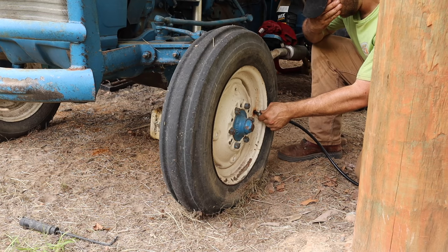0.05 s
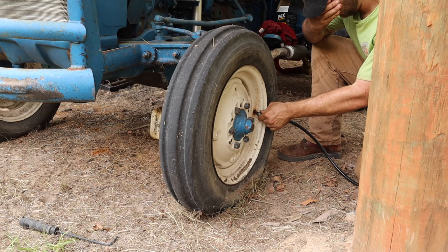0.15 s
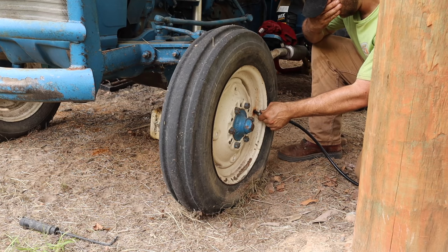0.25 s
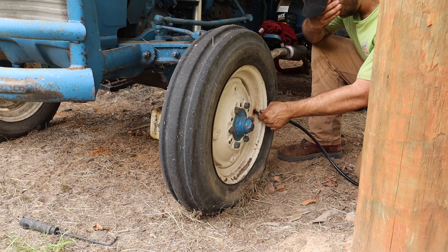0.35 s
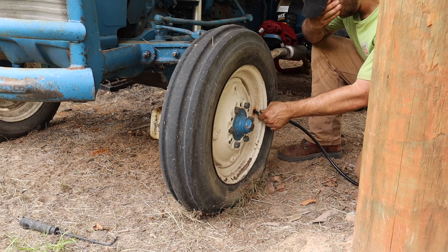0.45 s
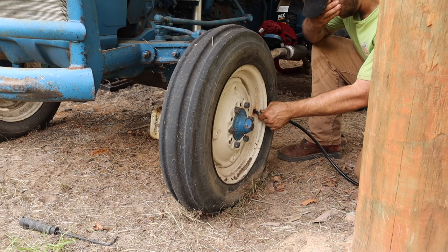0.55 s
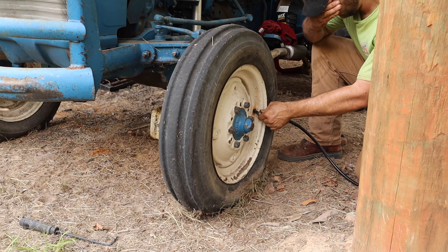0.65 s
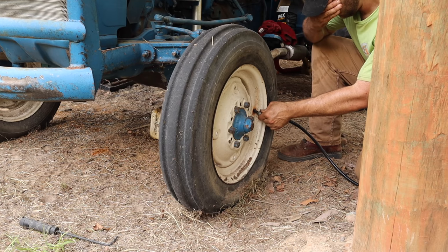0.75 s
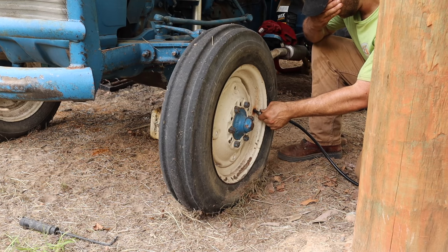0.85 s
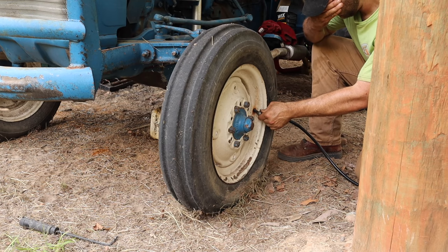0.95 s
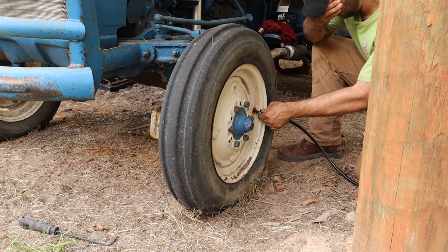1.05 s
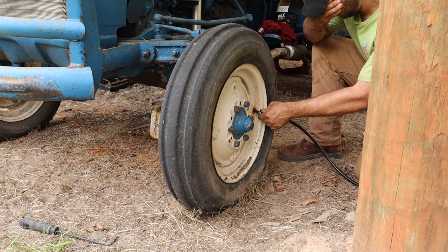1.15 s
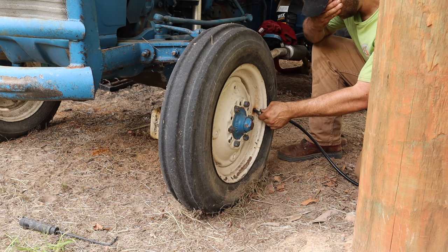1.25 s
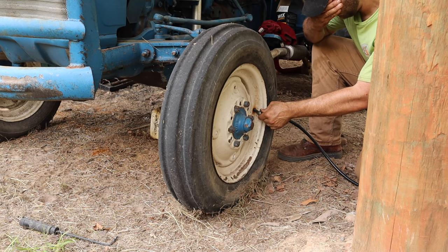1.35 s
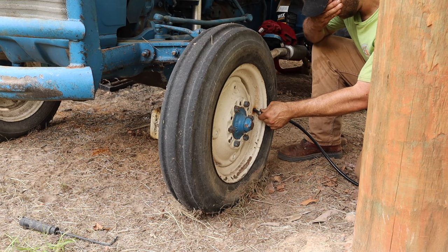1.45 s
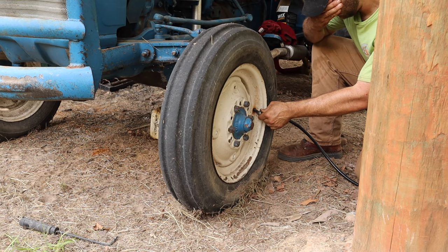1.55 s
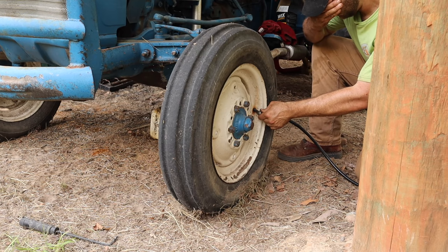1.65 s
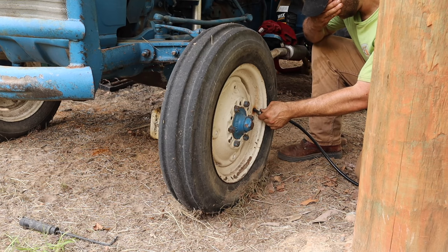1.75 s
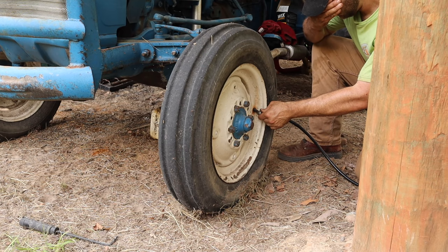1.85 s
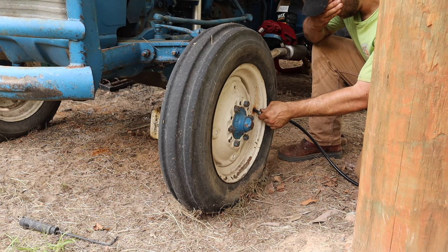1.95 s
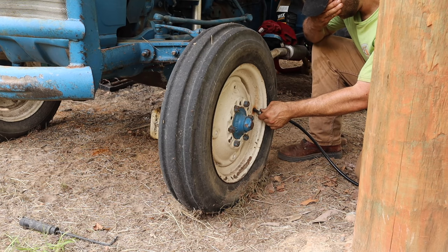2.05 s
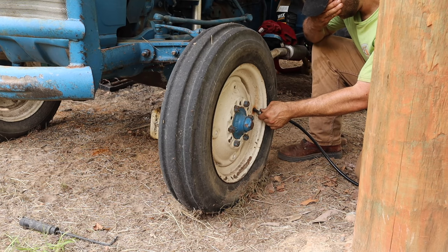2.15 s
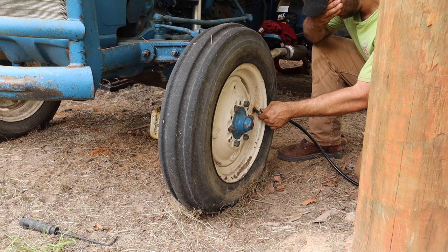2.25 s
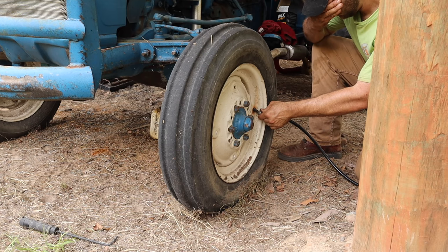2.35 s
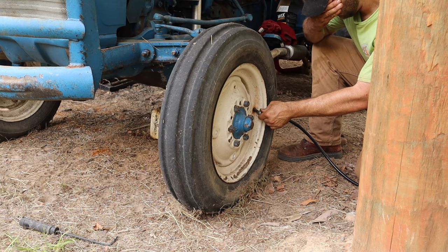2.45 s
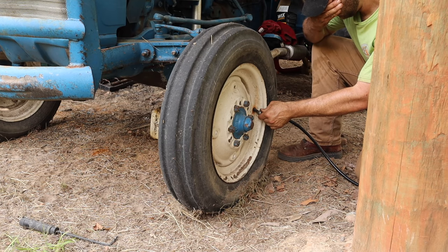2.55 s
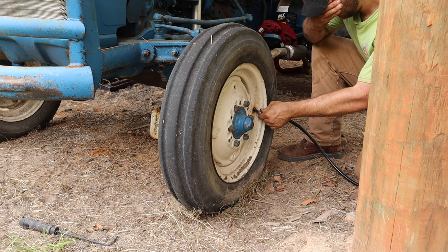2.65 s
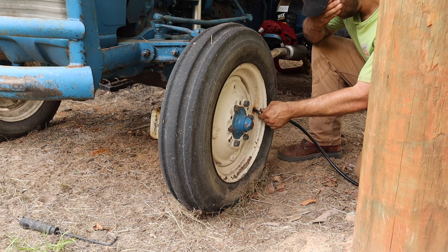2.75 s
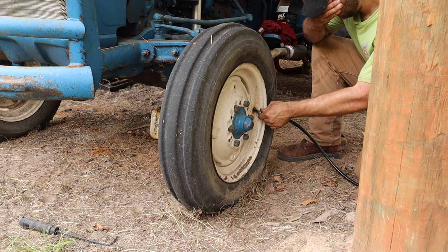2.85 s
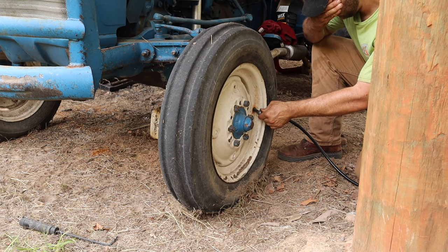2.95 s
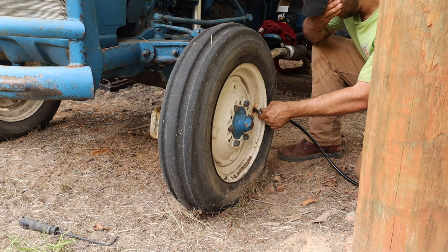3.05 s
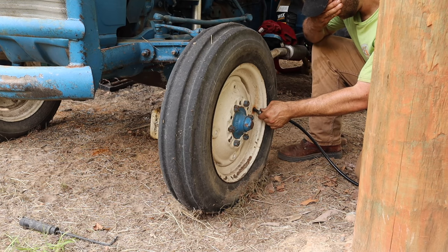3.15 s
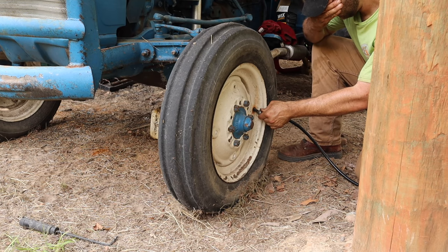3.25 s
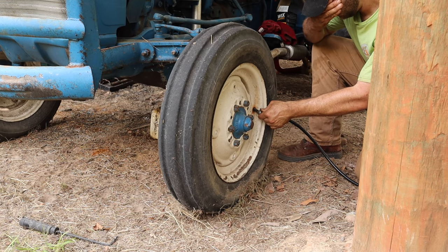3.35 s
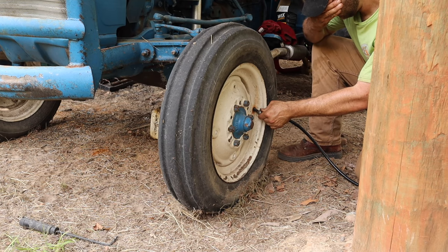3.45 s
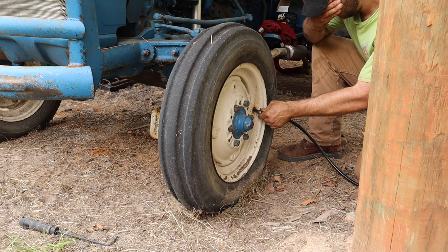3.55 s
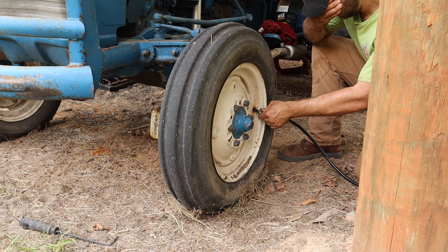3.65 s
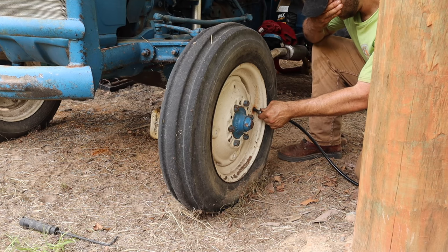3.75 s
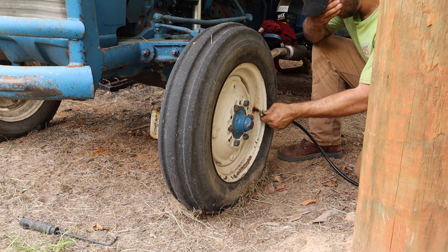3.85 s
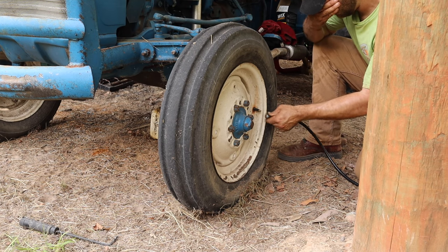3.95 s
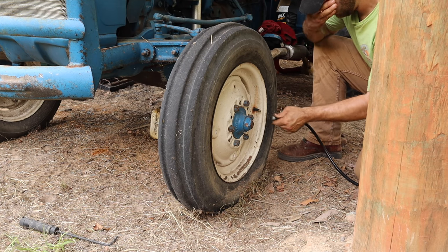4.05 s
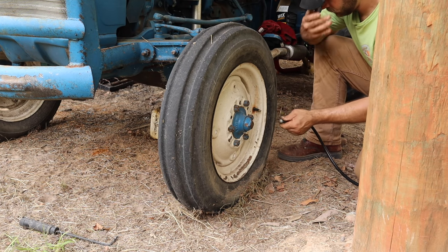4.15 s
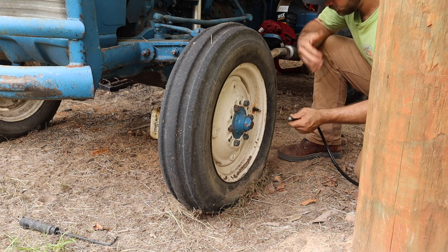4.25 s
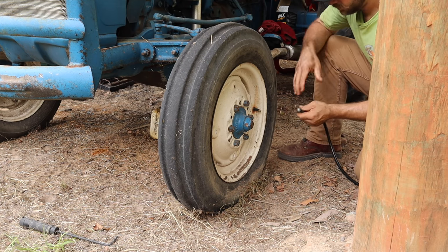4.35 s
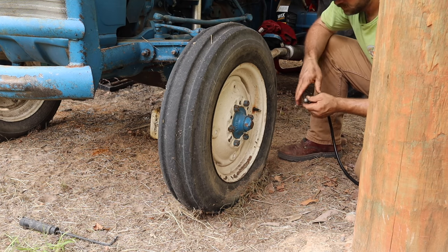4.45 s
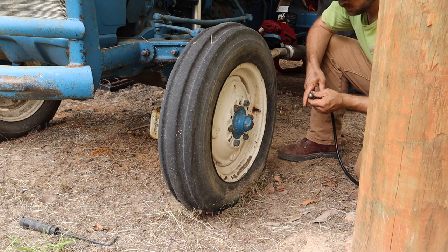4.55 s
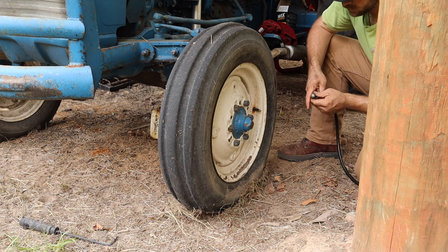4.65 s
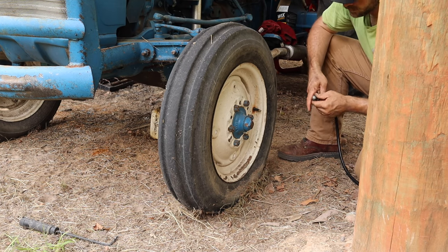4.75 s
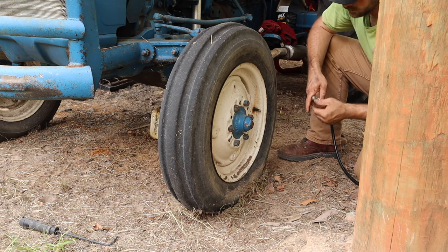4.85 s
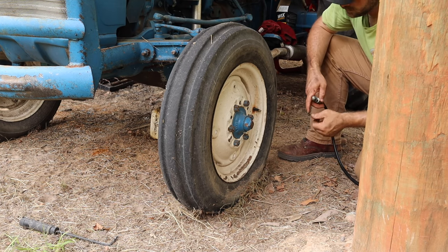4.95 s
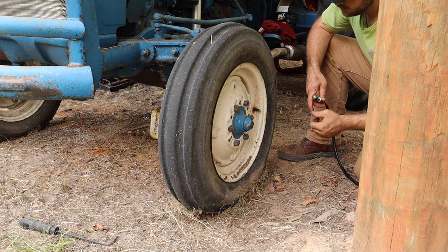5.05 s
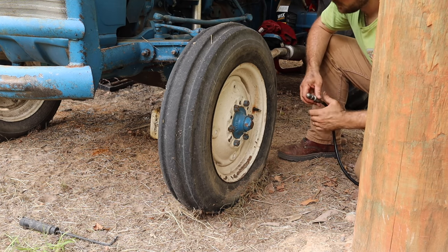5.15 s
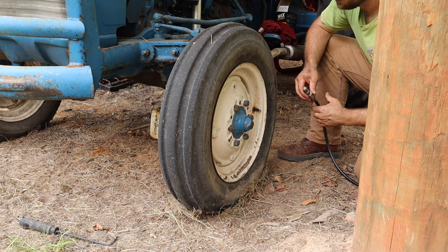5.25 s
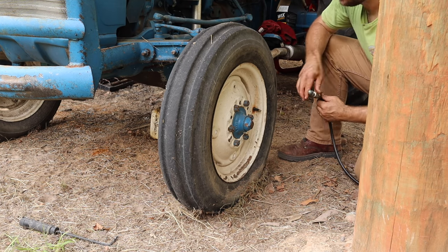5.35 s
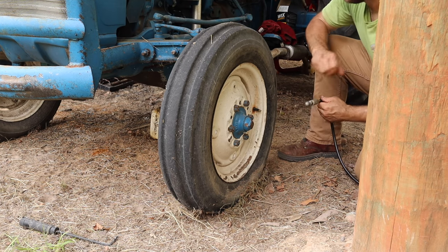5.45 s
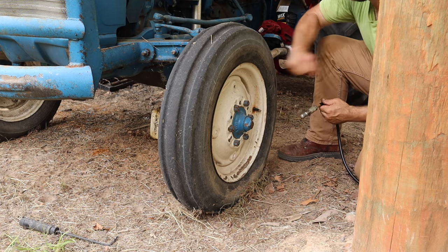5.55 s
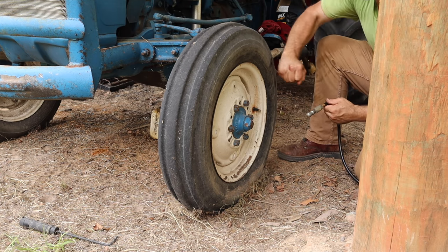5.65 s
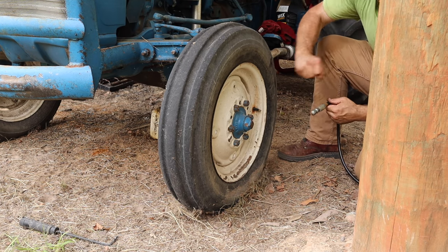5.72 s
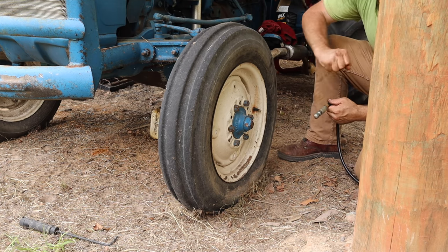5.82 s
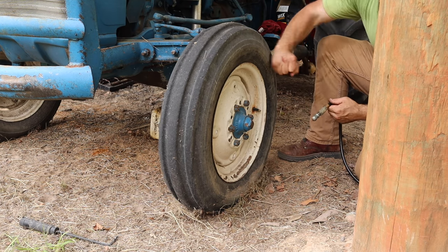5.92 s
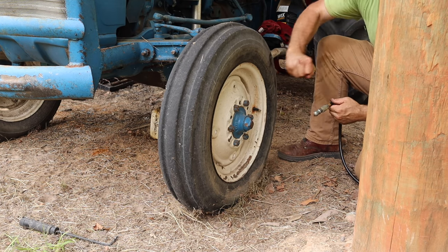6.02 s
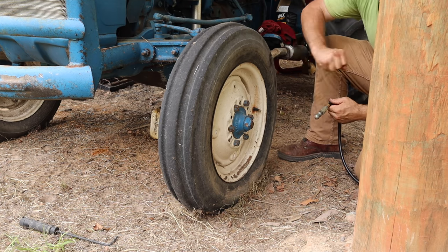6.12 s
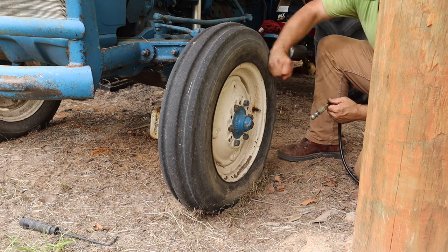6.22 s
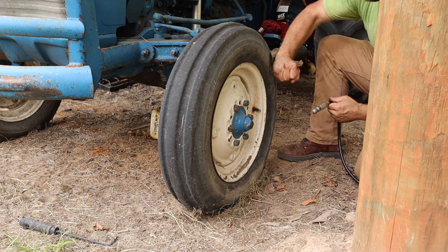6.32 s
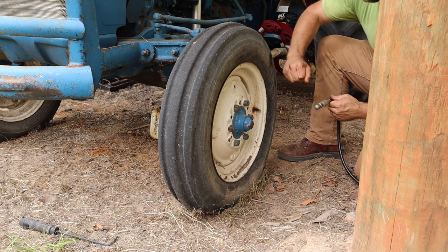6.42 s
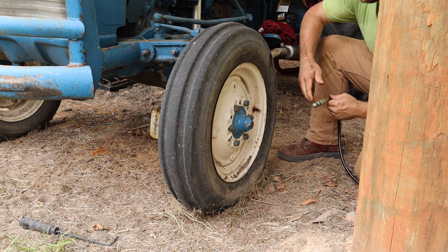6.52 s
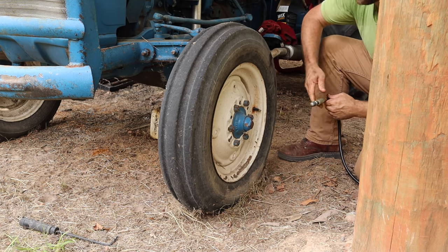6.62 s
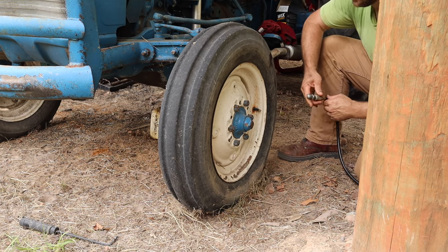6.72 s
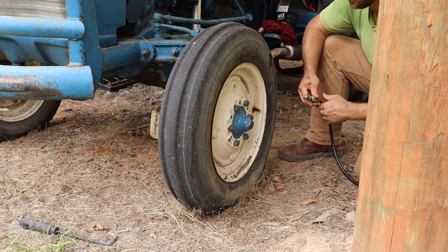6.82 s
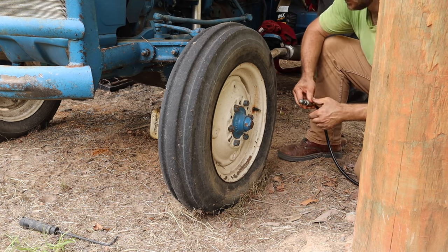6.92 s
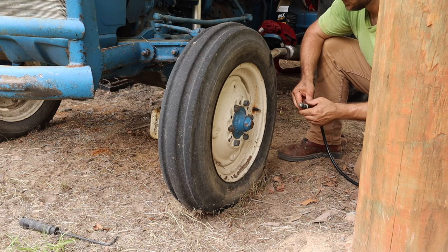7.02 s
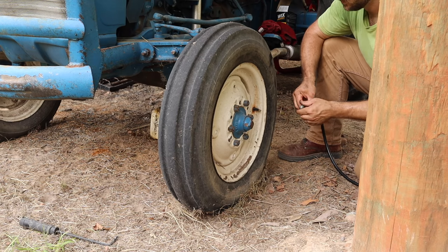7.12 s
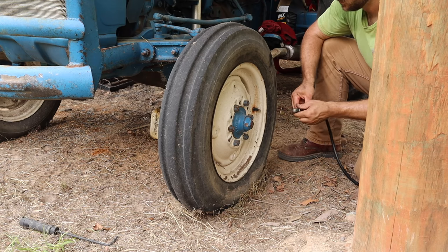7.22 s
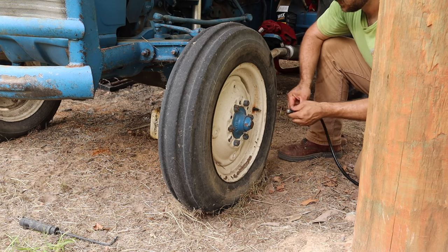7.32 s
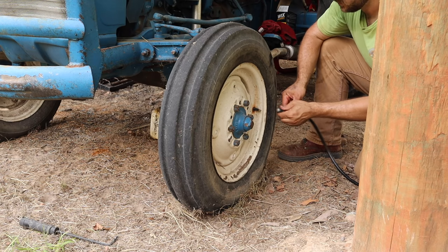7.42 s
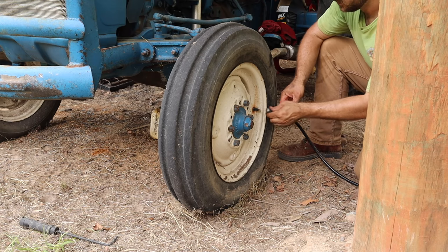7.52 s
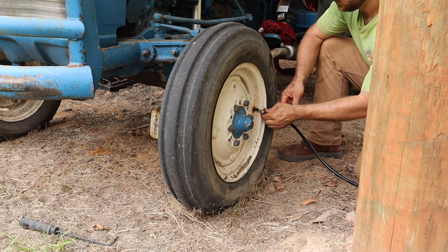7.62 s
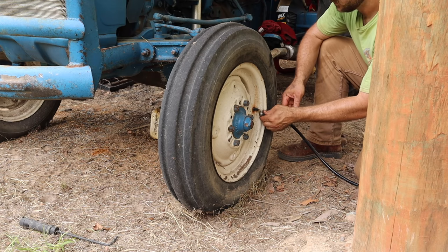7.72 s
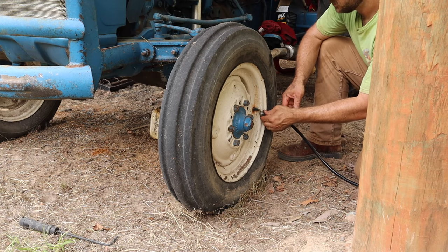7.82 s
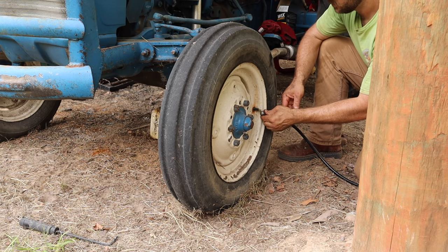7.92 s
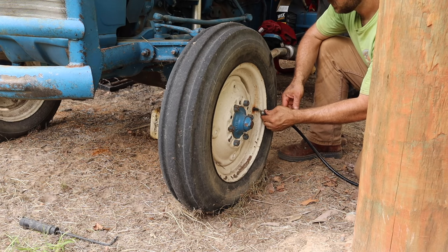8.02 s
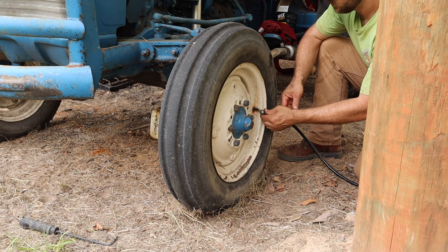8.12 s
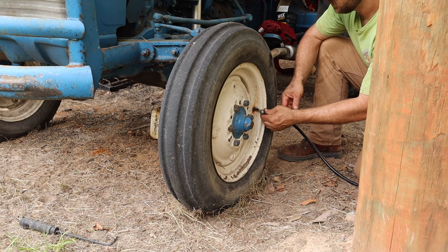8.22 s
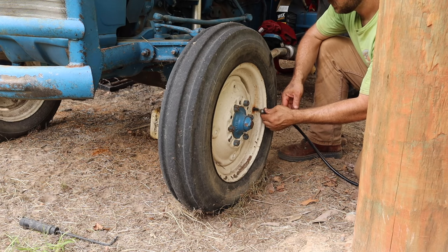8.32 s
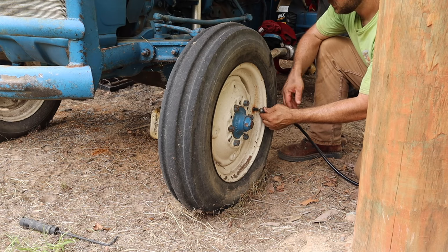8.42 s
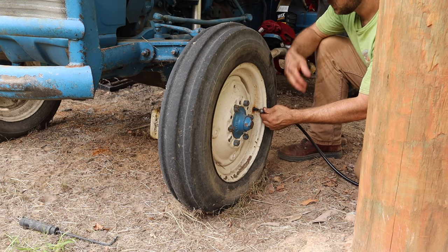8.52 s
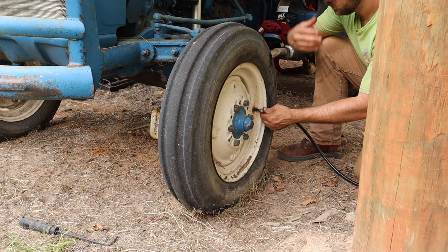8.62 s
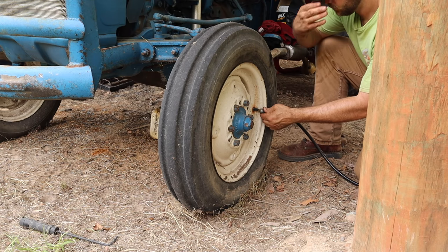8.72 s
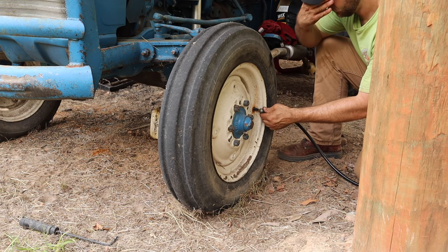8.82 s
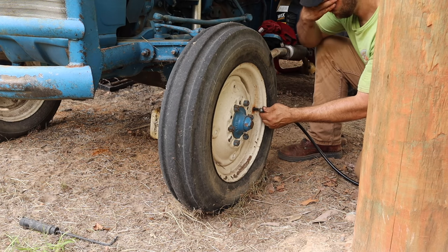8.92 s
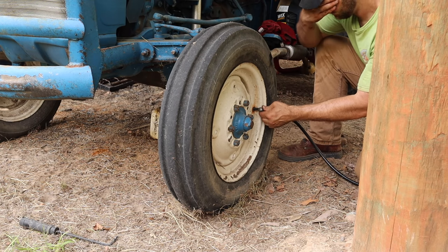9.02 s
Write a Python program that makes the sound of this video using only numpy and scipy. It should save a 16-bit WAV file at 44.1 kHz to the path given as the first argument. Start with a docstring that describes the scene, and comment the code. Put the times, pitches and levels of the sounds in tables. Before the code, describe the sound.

A faint motor hum gives way to air hissing steadily from a hose into a tractor tyre, until the chuck pops off with a sharp puff. Three loud knocks ring a hollow steel body and rattle its panels. The chuck clicks back on, leaks with a loud whistling hiss and puffs off again. It is heard in stereo a few metres from an open shed, with low rumble and a faint bird.

```python
"""Air hisses from a hose into a tractor tyre at the mouth of an open shed, heard in stereo a few metres off. A
motor hums first; then the scene changes to low rumble and the hiss of filling, until the chuck pops off with a
puff. Three knocks ring a hollow steel body and rattle its panels. The chuck clicks back on, leaks loudly
through a poor seal and pops off again. The shed echoes the near sounds; a faint bird whistles far away."""
import sys
import numpy as np
from scipy import signal
from scipy.fft import rfft, irfft
from scipy.io import wavfile
from scipy.ndimage import uniform_filter1d

SR = 44100
rng = np.random.default_rng(int(sys.argv[2]) if len(sys.argv) > 2 else 0)


def master_out(mix):
    """Clip the mix to full scale and print it as 16-bit PCM to the path in sys.argv[1]."""
    frames = np.transpose(np.atleast_2d(mix))
    ceiling = np.clip(frames, -1, 1)
    pcm = np.round(ceiling * 32767).astype(np.int16)
    wavfile.write(sys.argv[1], SR, pcm)


N = 400428
T = np.arange(N) / SR
FILL_START_S = 1.18


def undb(db):
    """Decibels to gain."""
    return 10 ** (np.asarray(db, float) / 20)


def on_log(hz, table):
    """Read an (Hz, dB) table on a log-frequency axis."""
    f, db = np.transpose(table)
    return np.interp(np.log(hz + 1), np.log(f + 1), db)


def noise(colour, width, resonances=(), size=N, locked=0.):
    """Coloured stereo noise of mid rms 1; positive `locked` leads the left ear in phase."""
    hz = np.arange(size // 2 + 1) * SR / size
    db = on_log(hz, colour) + sum(boost / (1 + (2 * (hz - f) / bw) ** 2) for f, bw, boost in resonances)
    mid, side = rfft(rng.standard_normal((2, size))) * undb(db)
    side = 1j * locked * mid + np.sqrt(1 - locked ** 2) * side
    mid, side = irfft(mid, size), irfft(side * undb(on_log(hz, width)), size)
    return np.array([mid + side, mid - side]) / np.std(mid)


def band(x, hz, width_hz):
    """Two-pole band-pass."""
    return signal.lfilter(*signal.iirpeak(hz, hz / width_hz, fs=SR), x)


def wander(rate_hz):
    """Smooth random drift with a spread near 1."""
    hold = int(SR / rate_hz)
    steps = np.repeat(rng.standard_normal(N // hold + 1), hold)
    return 1.72 * uniform_filter1d(uniform_filter1d(steps, hold), hold)[:N]


def gate(start, end, rise, fall):
    """Opens from start and has closed at end + fall, all in seconds."""
    return np.clip((T - start) / rise, 0, 1) * np.clip((end + fall - T) / fall, 0, 1)


def decay(t, t60):
    """Silent before t = 0, then falling 60 dB every t60 seconds."""
    return (t >= 0) * np.exp(-np.log(1000) * np.abs(t) / t60)


def ring(t, hz, t60):
    """A fading mode at a random phase."""
    return decay(t, t60) * np.sin(2 * np.pi * (hz * t + rng.random()))


# The motor's tones. Each row: pitch in Hz, bandwidth in Hz, level in dB.
MOTOR_TONES = [(224.4, 9.3, -57), (284.6, 3.4, -55), (389.5, 6.9, -59.5), (452, 10, -58), (460, 6.2, -66),
               (568.7, 4.9, -55), (654, 5.6, -58.5), (756, 4.7, -53.5), (830, 10, -79), (894, 8.7, -62),
               (949, 6.6, -60)]
# Tone colour of the hiss under them. Each row: frequency in Hz, level in dB.
MOTOR_HISS = [(18, -69), (30, -20), (187, -8.5), (207, -4), (284, -1.5), (332, -8), (559, -2.5), (708, -12),
              (765, -3), (828, -8), (1470, -16), (1630, -16), (15400, -20.5)]
# Its stereo width. Each row: frequency in Hz, side over mid in dB.
MOTOR_WIDTH = [(60, -35), (110, -29), (200, -42), (380, -22), (700, -13), (1290, -2), (2380, 0.5),
               (4390, 0), (8110, -1), (15000, 2.5)]


def motor():
    """A motor hums in narrow wavering tones over a thin hiss until the scene changes."""
    hum = np.zeros(N)
    for hz, width_hz, db in MOTOR_TONES:
        tone = band(rng.standard_normal(N), hz, width_hz)
        hum += undb(db) * tone / np.std(tone)
    hiss = undb(-46) * noise(MOTOR_HISS, MOTOR_WIDTH)
    return (hum + hiss) * gate(-1.1, FILL_START_S, rise=1, fall=0.0089)


# Chuck and cap against metal. Each row: start in seconds, level in dB, pitch in Hz, t60 in seconds.
CLICKS = [(0.115, -28.5, 1260, 0.044), (0.1218, -29.5, 1670, 0.038), (0.1397, -38, 1890, 0.14),
          (7.745, -36, 2500, 0.019), (7.7565, -37.5, 2650, 0.036), (7.766, -46, 2480, 0.066),
          (7.794, -38.5, 2570, 0.048), (7.881, -24, 2850, 0.011), (7.8938, -44, 1070, 0.033),
          (8.064, -42.5, 1680, .04), (8.2689, -25.5, 3030, .015), (8.285, -42, 1460, 0.024),
          (8.412, -24, 2680, 0.01), (8.4192, -30, 3020, 0.015), (8.4364, -26, 2500, 0.013)]
# Stereo width of the clicks and the leak. Each row: frequency in Hz, side over mid in dB.
CHUCK_WIDTH = [(60, -25), (110, -15), (200, -9), (380, -9), (700, -9), (1290, -10), (2380, -32),
               (4390, -2.5), (8110, -6), (15000, 7)]


def clicks():
    """Brass ticks on steel: a short ring with a grainy scratch around its pitch."""
    colour = [(500, -32), (1200, 4), (2500, 7.5), (7000, -3.5), (13000, -23)]  # Hz, dB
    scratch = noise(colour, CHUCK_WIDTH)
    out = np.zeros((2, N))
    for start, db, hz, t60 in CLICKS:
        t = T - start
        grain = 0.36 * band(scratch, hz, width_hz=0.55 * hz) + 0.31 * scratch
        envelope = np.clip(t / 0.00091, 0, 1) * decay(t, t60)
        out += undb(db) * (0.29 * ring(t, hz, t60) + grain * envelope)
    return out


# The dark bed of the yard. Each row: frequency in Hz, level in dB.
RUMBLE_COLOUR = [(12, -29.5), (20, -3), (152, -2), (259, -10), (305, -15), (341, -16.5), (371, -18.5),
                 (415, -16.5), (464, -16.5), (983, -22.5), (1070, -25.5), (1920, -29.5), (3840, -36.5),
                 (8600, -51.5), (15400, -61)]
# Stereo width of rumble, rustle and wisps. Each row: frequency in Hz, side over mid in dB.
YARD_WIDTH = [(60, -33.5), (110, -31), (200, -12), (380, -0.5), (700, 0), (1290, 5.5), (2380, 5),
              (4390, 7.5), (8110, 12.5), (15000, 8)]


def rumble():
    """Distant rumble that swells a little."""
    level = undb(-44.5 + 0.54 * wander(9))
    return level * noise(RUMBLE_COLOUR, YARD_WIDTH) * gate(FILL_START_S, 10, rise=0.0083, fall=1)


# The bright hiss of filling. Each row: frequency in Hz, level in dB.
FILL_COLOUR = [(410, -21), (700, -6), (1250, -10), (1640, -9.5), (1900, -5.5), (4400, -2.5), (5000, -14.5),
               (5410, -7), (12400, 0), (14500, -17.5), (15400, -22.5)]
# Its stereo width. Each row: frequency in Hz, side over mid in dB.
FILL_WIDTH = [(60, -27.5), (110, -27.5), (200, -17.5), (380, 1.5), (700, 0.5), (1290, -1.5), (2380, -5.5),
              (4390, 8), (8110, 4.5), (15000, -0.5)]
# Resonances of chuck and stem. Each row: centre in Hz, bandwidth in Hz, boost in dB.
STEM_RESONANCES = [(1660, 36, 15.5), (4500, 140, 6), (5300, 400, 7), (7680, 82, 12), (11800, 130, -7),
                   (12200, 500, 4)]


def filling():
    """Air flows steadily through the seated chuck and the stem, a touch to the left."""
    level = undb(-43.5 + 0.4 * wander(20))
    hiss = noise(FILL_COLOUR, FILL_WIDTH, STEM_RESONANCES, locked=0.8)
    pan = undb([[0.35], [-0.35]])
    return level * hiss * pan * gate(FILL_START_S, 3.86, rise=0.0066, fall=0.011)


# The chuck comes off. Each row: start, rise, length and fall in seconds, puff and pop levels in dB.
PUFFS = [(3.853, .006, .0245, .001, -9.5, -3), (8.961, .01, .026, .016, -9, -30)]
# One tone colour per puff. Each row of a colour: frequency in Hz, level in dB.
PUFF_COLOURS = [
    [(59, -34), (100, -1.5), (613, -11.5), (1200, -6), (1620, -3), (3110, -2.5), (4940, -5), (8550, -3),
     (12200, -3.5), (15400, -17)],
    [(59, -43), (100, -10), (639, -9.5), (1150, -15), (2080, -3.5), (2270, -10.5), (3110, -4.5),
     (5970, -6.5), (11000, -1.5), (15400, -14)],
]
# Their stereo width. Each row: frequency in Hz, side over mid in dB.
PUFF_WIDTH = [(60, -16), (110, -11), (200, -15.5), (380, -2.5), (700, -1.5), (1290, -1), (2380, -3.5),
              (4390, -5.5), (8110, -5), (15000, -0.5)]


def puffs():
    """Air bursts out as the chuck leaves the stem, then the valve core snaps shut with a pop."""
    out = np.zeros((2, N))
    for (start, rise, length, fall, puff_db, pop_db), colour in zip(PUFFS, PUFF_COLOURS):
        envelope = undb(puff_db + 0.58 * wander(300)) * gate(start, start + length, rise, fall) ** 2
        out += envelope * noise(colour, PUFF_WIDTH, locked=-0.65)
        shut_s = start + length - 0.00065
        out += undb(pop_db) * ring(T - shut_s, hz=1150, t60=0.0045)
    return out


# The airy rustle. Each row: frequency in Hz, level in dB.
RUSTLE_COLOUR = [(2000, -1), (3000, 1), (4500, 1), (6000, -8.5), (8300, -8), (10200, -12), (12500, -13),
                 (14000, -37)]


def rustle():
    """A faint rustle comes in with the first puff and lulls for a while after the knocks."""
    lull_db = -10 * np.exp(-((T - 6.5) / 0.4) ** 2)
    level = undb(-63 + lull_db + 1.8 * wander(14))
    return (T > PUFFS[0][0]) * level * noise(RUSTLE_COLOUR, YARD_WIDTH)


# Wisps of hiss. Each row: start in seconds, level in dB, rise and 1/e fade time in seconds.
WISPS = [(3.9, -52, .02, 0.45), (4.9, -79, .2, .4), (7.15, -65.5, 0.077, .5)]
# Their tone colour. Each row: frequency in Hz, level in dB.
WISP_COLOUR = [(2500, 3.5), (4500, -1), (8300, -3), (12000, -2.5), (14000, -30)]


def wisps():
    """Brighter hiss rises and dies away as the chuck is handled."""
    envelope = sum(undb(db) * np.clip((T - start) / rise, 0, 1) * np.exp(-np.abs(T - start) / fade)
                   for start, db, rise, fade in WISPS)
    return envelope * undb(2.5 * wander(11)) * noise(WISP_COLOUR, YARD_WIDTH)


# High, far tones. Each row: start and end in seconds, pitch and bandwidth in Hz, level in dB.
THIN_TONES = [(4.56, 5.08, 4750, 450, -65), (4.96, 5.56, 5850, 150, -68), (5.04, 5.56, 4100, 200, -65),
              (4.0, 8.8, 8200, 900, -73), (4.2, 5.37, 10080, 500, -68)]


def thin_tones():
    """Narrow bands of flickering hiss far off, perhaps insects."""
    out = np.zeros((2, N))
    for start, end, hz, width_hz, db in THIN_TONES:
        hiss = band(band(rng.standard_normal((2, N)), hz, width_hz), hz, width_hz)
        envelope = undb(db + 3.3 * wander(30)) * gate(start, end, rise=0.029, fall=0.04)
        out += envelope * hiss / np.std(hiss)
    return out


# The bird's song. Each row: start and length in seconds, first pitch, last pitch and mid-note bend in Hz.
BIRD_NOTES = [(5.075, .035, 3600, 3050, -50), (5.34, .04, 3500, 3050, -50), (5.48, .05, 3400, 3100, -80),
              (5.555, .055, 3100, 4700, 0), (7.935, .1, 3700, 3850, 200), (8.035, .06, 3850, 4850, 200),
              (8.08, .05, 4050, 4200, -150), (8.155, .045, 5000, 4000, 100),
              (8.215, .175, 3580, 3620, -180)]


def bird(flutter_hz=35, flutter_db=3.5, fade_s=0.012):
    """A distant bird whistles thin glides that flutter in pitch and level."""
    out = np.zeros((2, N))
    for start, length, first, last, bend in BIRD_NOTES:
        progress = np.clip((T - start) / length, 0, 1)
        hz = first + (last - first) * progress + bend * np.sin(np.pi * progress) + flutter_hz * wander(90)
        phase = 2 * np.pi * np.cumsum(hz) / SR + np.array([[0.4], [-0.4]])  # the left ear leads
        envelope = gate(start, start + length - fade_s, fade_s, fade_s)
        out += undb(-60 - flutter_db * np.abs(wander(66))) * envelope * np.sin(phase)
    return out


# The knocks. Each row: start in seconds, ring and crack levels in dB, share of the upper of the
# two boom modes from 0 to 1, rattle level in dB.
KNOCKS = [(5.6465, -8, -12.5, 0.47, -21.5), (5.969, -8.5, -12, 0.16, -19), (6.2886, -8, -7.5, 0.16, -17)]
# The two modes of the low boom. Each row: pitch in Hz, level in dB, t60 in seconds.
BOOM_MODES = [(145.1, 7.5, 0.33), (160.8, 9, 0.36)]
# The steel body's other modes. Each row: pitch in Hz, level in dB, t60 in seconds.
BODY_MODES = [(37.8, -14, 1.17), (117, 5, 0.15), (203.8, -5.5, 0.24), (243.4, -11.5, 0.52),
              (299, -18.5, 0.52), (407, -5, 0.28), (439, -13, 0.27), (469, -30, 0.22), (545, -19, 0.53),
              (565, -18, 0.15), (615, -21, 0.64), (683, -4, 0.14), (773, -11, 0.24), (787, -22, 0.46),
              (420, -31, 1.6), (712, -44, 1.3), (859, -23.5, 0.32), (957, -32.5, 0.55), (1236, -37, 0.57),
              (1336, -31.5, 0.55)]
# Tone colours of the crack, the panels and the loose sheet. Each row: frequency in Hz, level in dB.
CRACK_COLOUR = [(300, -21), (800, 5.5), (1800, -17.5), (3000, -5), (6000, -14.5), (12000, -17.5),
                (15500, -39)]
RATTLE_COLOUR = [(200, 3.5), (500, 1.5), (1000, -10), (2000, -20.5), (5000, -34), (10000, -38.5),
                 (15000, -56)]
BUZZ_COLOUR = [(800, -20), (1500, 5), (2200, 1), (3300, 2), (4400, -3), (7000, -12), (12000, -25)]
# Stereo width of the knocks' noise and the echo. Each row: frequency in Hz, side over mid in dB.
SHED_WIDTH = [(60, -59.5), (110, -48), (200, -37.5), (380, -17), (700, -11.5), (1290, -10.5), (2380, -3),
              (4390, -0.5), (8110, 2.5), (15000, 4.5)]


def knocks(swell_s=0.014, waver_db=3, detune=0.012):
    """Each knock cracks, then the hollow steel body swells into its modes and its panels rattle."""
    out, n = np.zeros((2, N)), SR
    t = T[:n]
    rattle = noise(RATTLE_COLOUR, SHED_WIDTH) * undb(2.56 * wander(60))
    crack = noise(CRACK_COLOUR, SHED_WIDTH)
    waver = waver_db * wander(35)  # stands for uneven beating between close modes
    buzz = noise(BUZZ_COLOUR, SHED_WIDTH) * undb(-28.5 + 2.5 * wander(70))
    swell = (1 - np.exp(-t / swell_s)) ** 2
    rattle_shape = (1 - np.exp(-t / 0.0078)) * decay(t, t60=0.91)
    rattle_shape *= 0.33 + np.exp(-(t / 0.11) ** 4)  # the panels shake for a moment, then settle
    buzz_shape = np.exp(-(t / 0.12) ** 2.3)  # loose sheet buzzes evenly, then stops
    for start, ring_db, _, upper_share, rattle_db in KNOCKS:
        body = sum(share * undb(db) * ring(t, hz, t60)
                   for share, (hz, db, t60) in zip((1 - upper_share, upper_share), BOOM_MODES))
        for hz, db, t60 in BODY_MODES:
            level = undb(db + waver[rng.integers(N - n):][:n])
            body += level * ring(t, hz * (1 + detune * rng.standard_normal()), t60)
        span = slice(int(start * SR), int(start * SR) + n)
        out[:, span] += undb(ring_db) * swell * body
        out[:, span] += undb(rattle_db) * (rattle_shape * rattle[:, span] + buzz_shape * buzz[:, span])
    hits = [(start, crack_db) for start, _, crack_db, _, _ in KNOCKS]
    bounce = (6.2915, -2.5)  # the last knock bounces once: seconds, dB
    for start, db in hits + [bounce]:
        out += undb(db) * crack * decay(T - start, t60=0.005)
    return out


# The seal slips open. Each row: start in seconds, whistle level reached in dB, settling time in seconds.
SEAL_SLIPS = [(8.434, -31.5, 0.016), (8.461, -24.5, .002), (8.474, -22, .003), (8.49, -19, 0.0096)]
# The escaping air. Each row: frequency in Hz, level in dB.
LEAK_COLOUR = [(88, -43), (150, -34), (253, -30), (519, -24), (2140, -10.5), (2540, -8), (6080, -7),
               (8460, 0.5), (9320, -6), (12000, 1), (15400, -24.5)]
# Its whistles. Each row: centre in Hz, bandwidth in Hz, boost in dB.
LEAK_WHISTLES = [(7030, 270, 9), (8520, 540, 6), (9700, 310, 5.5), (11800, 300, -1)]


def leak(end_s=8.96, sag_db_per_s=9.5, tilt_db=5.5, tilt_s=0.2):
    """A poor seal opens step by step and whistles; the flow sags as the hose pressure drops."""
    starts, levels_db, settles = np.transpose(SEAL_SLIPS)
    steps, full_gain = np.diff(undb(levels_db), prepend=0), undb(levels_db[-1])
    flow = sum(step * np.clip((T - start) / settle, 0, 1)
               for start, step, settle in zip(starts, steps, settles)) / full_gain
    flow *= undb(-sag_db_per_s * np.maximum(T - starts[-1], 0))
    air = noise(LEAK_COLOUR, CHUCK_WIDTH, LEAK_WHISTLES, locked=-0.74) * undb(0.78 * wander(40))
    lows = signal.sosfiltfilt(signal.butter(4, 6000, fs=SR, output="sos"), air)
    whistle, rush = (part / np.std(part.mean(axis=0)) for part in (air - lows, lows))
    # tilting the chuck off swells the rush and opens a hollow resonance
    tilt = undb(tilt_db * np.clip(1 - (end_s - T) / tilt_s, 0, 1))
    rush += 0.85 * (tilt - 1) * band(rush, hz=2650, width_hz=720)
    rush *= undb(-27.5) * tilt * flow ** 1.48  # grows faster with the flow than the whistle does
    return (whistle * full_gain * flow + rush) * gate(0, end_s, rise=1, fall=0.033)


# The shed's echo, roughly by octave. Each row: centre in Hz, level in dB, t60 in seconds.
ECHO_BANDS = [(127, -28, .3), (244, -17, 0.43), (525.7, -17.5, 0.4), (900, -22, 0.3), (1987, -14.5, 0.18),
              (4000, -16, 0.13), (8000, -15, 0.23), (13000, -23.5, .15)]


def shed_echo(sound, onset_s=0.0094):
    """Shed and tractor return a diffuse echo that fades faster in the treble."""
    n = SR // 2
    t = T[:n]
    white = noise([(20, 0), (20000, 0)], SHED_WIDTH, size=n)
    echo = sum(undb(db) * band(white, hz, 0.7 * hz) * decay(t, t60) / np.sqrt(t60 * hz)
               for hz, db, t60 in ECHO_BANDS)
    echo *= undb(6 * np.exp(-t / 0.011))  # near surfaces answer first
    echo *= undb(3 * np.exp(-((t - 0.1) / 0.025) ** 2))  # a far wall answers once
    return signal.fftconvolve(sound[None], echo * (t > onset_s), axes=1)[:, :N]


def scene():
    """The near sounds and their echo sit over a dry background."""
    near = filling() + leak() + puffs() + knocks() + clicks()
    echo = shed_echo(near.mean(axis=0))
    background = motor() + rustle() + wisps() + rumble() + bird() + thin_tones()
    return near + echo + background


def record(dry, low_cut_hz=42, high_cut_hz=15500):
    """The deepest bass is cut, the loudest peaks clip and the top is cut."""
    low_cut = signal.butter(2, low_cut_hz, "high", fs=SR, output="sos")
    high_cut = signal.ellip(12, 0.2, 70, high_cut_hz, fs=SR, output="sos")
    clipped = np.clip(signal.sosfilt(low_cut, dry), -1, 1)
    return signal.sosfilt(high_cut, clipped)


dry = scene()
out = record(dry)
master_out(out)
```